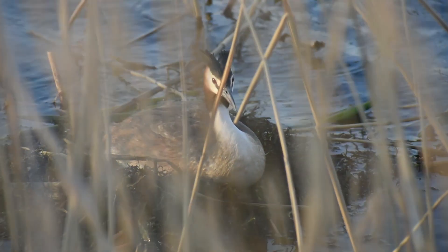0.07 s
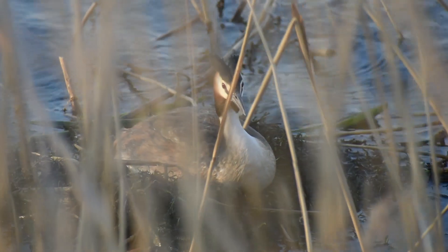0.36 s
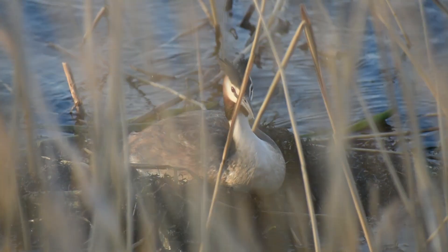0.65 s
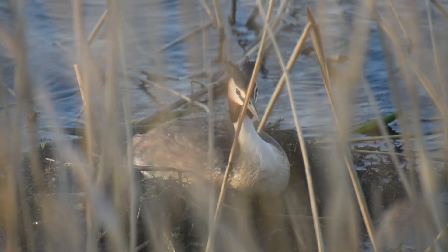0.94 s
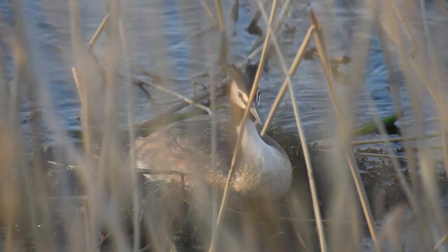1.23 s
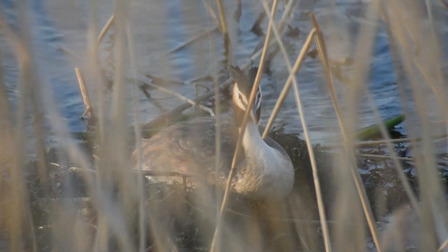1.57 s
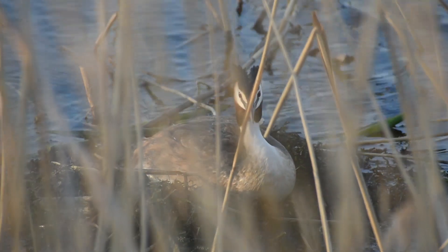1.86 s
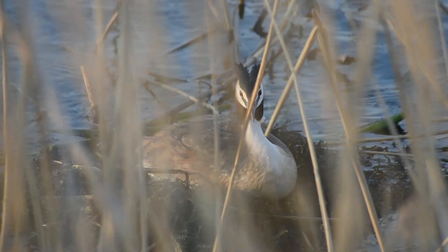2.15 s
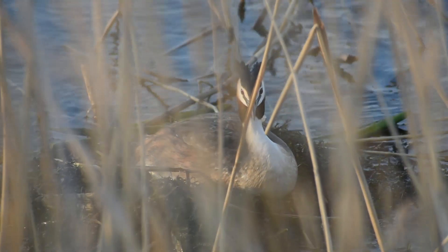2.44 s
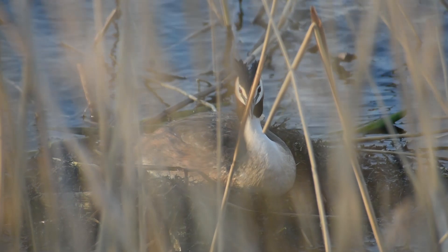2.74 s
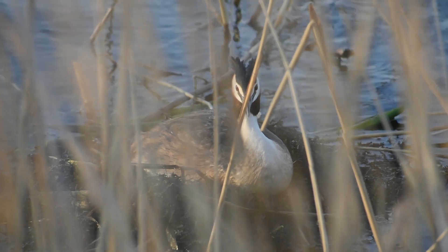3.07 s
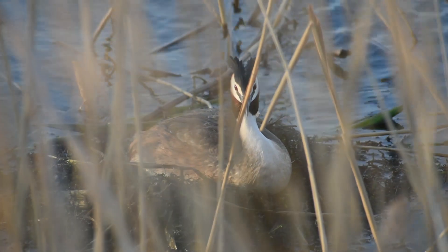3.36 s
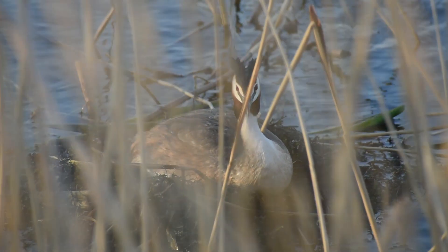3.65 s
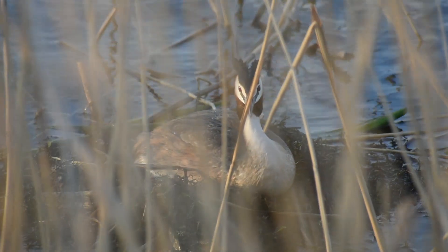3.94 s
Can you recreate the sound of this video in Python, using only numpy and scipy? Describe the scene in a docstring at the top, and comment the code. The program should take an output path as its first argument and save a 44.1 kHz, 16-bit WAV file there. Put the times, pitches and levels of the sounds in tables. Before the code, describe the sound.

Uneven gusts of wind thump and rumble on the microphone beside reeds and water. The opening gusts are the strongest, and a second burst follows a quieter stretch, while the reeds hiss and sigh faintly in the background.

```python
"""Gusts of wind buffet a microphone at the reedy edge of a lake.
Turbulent pressure on the diaphragm makes a deep rumble, single eddies thump it, and the harder gusts
break into a higher flutter with sharp puffs at their crests. Behind them lie a steady hiss, faint sighs
of wind in the reeds and a fine crackle that repeats 50 times a second, like a distant power line."""
import numpy as np
from scipy import signal
from scipy.fft import rfft, irfft
from scipy.ndimage import uniform_filter1d
import sys
import numpy as np
from scipy import signal
from scipy.fft import rfft, irfft
from scipy.io import wavfile
from scipy.ndimage import uniform_filter1d

SR = 44100
rng = np.random.default_rng(int(sys.argv[2]) if len(sys.argv) > 2 else 0)


def bounce(signal):
    """Save signal as a 16-bit WAV file at the path given by the first command-line argument."""
    frames = np.transpose(np.atleast_2d(signal))
    limited = np.clip(frames, -1, 1)
    pcm = np.round(limited * 32767).astype(np.int16)
    wavfile.write(sys.argv[1], SR, pcm)


N = 176400


def amp(db):
    """Amplitude ratio: tenfold for every 20 dB."""
    return 10 ** (np.asarray(db) / 20)


def unit(x):
    """Normalisation to an rms of 1."""
    return x / np.sqrt(np.mean(x ** 2) + 1e-20)


def at_hz(points, hz):
    """Interpolation on a log-frequency axis."""
    f, value = np.transpose(points)
    return np.interp(np.log(hz + 1), np.log(f + 1), value)


def at_time(points):
    """Linear interpolation of a curve at every sample."""
    return np.interp(np.arange(N) / SR, *np.transpose(points))


def colour(x, points, size=8192):
    """Minimum-phase filtering: a causal response shapes the spectrum; the result has rms 1."""
    log_gain = np.log(amp(at_hz(points, abs(np.fft.fftfreq(size, 1 / SR)))))
    response = np.exp(np.conj(signal.hilbert(log_gain)))
    taps = np.fft.ifft(response).real[:size // 2]
    return unit(irfft(rfft(x) * rfft(taps, N), N))


def steadied(x, span_s):
    """Division by the running rms holds a random flow even over spans longer than span_s."""
    size = max(int(span_s * SR), 8)
    power = uniform_filter1d(uniform_filter1d(x ** 2, size), size)
    return unit(x / np.sqrt(abs(power) + 1e-4))


def eddies(rate_per_s=420, spread_db=6):
    """Shot noise: eddies strike at random, each a pressure impulse of random size and sign."""
    size = amp(spread_db * np.minimum(rng.exponential(1, N), 4))
    sign = rng.choice([-1., 1.], N)
    return size * sign * (rng.random(N) < rate_per_s / SR)


# Spectrum of the deep wind pressure: frequency_hz, relative_db
RUMBLE_SPECTRUM = [(10, -49), (25, -11.5), (45, 2), (65, 0), (92, 0.5), (130, -7), (200, -20.5), (300, -31),
                   (600, -71), (2000, -74.5)]

def rumble(gust_db, knee_db=-26):
    """Saturation: low turbulent noise grows with the gust, then levels off above the knee."""
    push = amp(gust_db) / np.sqrt(1 + amp(gust_db - knee_db) ** 2)
    turbulence = colour(rng.standard_normal(N), RUMBLE_SPECTRUM)
    return amp(0.5) * push * steadied(turbulence, span_s=0.05)


# Spectrum of one thump: frequency_hz, relative_db
THUMP_SPECTRUM = [(20, -51.5), (70, -12.5), (130, 0.5), (190, -1.5), (290, -8.5), (390, -25), (800, -76.5),
                  (2500, -101.5)]

def thumps(kicks, gust_db, flutter_db, flutter_share=0.51):
    """Impulse response: each eddy gives the diaphragm a short, low thump."""
    drive_db = (1 - flutter_share) * gust_db + flutter_share * (flutter_db + 12.5)
    return amp(drive_db - 4.5) * steadied(colour(kicks, THUMP_SPECTRUM), span_s=0.029)


# Spectrum of the flutter: frequency_hz, relative_db
FLUTTER_SPECTRUM = [(30, -21), (130, -10.5), (290, 2.5), (420, -10.5), (600, -25.5), (900, -42),
                    (1400, -57), (4000, -84)]

def flutter(kicks, flutter_db):
    """Impulse excitation: in hard gusts the same eddies drive a higher band, near 290 Hz."""
    return amp(flutter_db + 3.5) * steadied(colour(kicks, FLUTTER_SPECTRUM), span_s=0.027)


# Spectrum of the swirl: frequency_hz, relative_db
SWIRL_SPECTRUM = [(25, -44.5), (70, -31), (150, -1), (330, 1.5), (500, -7), (750, -19.5), (1100, -34.5),
                  (1600, -42), (4000, -63)]

def swirl(flutter_db):
    """Antiphase pressure: a small swirl pushes the two microphone ports in opposition."""
    pressure = amp(flutter_db - 16.5) * steadied(colour(eddies(), SWIRL_SPECTRUM), span_s=0.063)
    return pressure * np.array([[1], [-1]])


# Push of the wind on the microphone: time_s, relative_db
GUST_ENVELOPE = [(0.0, -30), (0.02, -9.5), (0.08, -26), (0.13, -10), (0.17, -47), (0.2, -20), (0.29, -27.5),
                 (0.32, -24), (0.43, -26.5), (0.49, -35.5), (0.57, -37.5), (0.63, -25), (0.68, -44),
                 (0.73, -29), (0.77, -47), (0.79, -31.5), (0.85, -21), (0.91, -29.5), (0.93, -25),
                 (1.04, -30.5), (1.08, -48.5), (1.17, -36.5), (1.26, -36), (1.29, -22), (1.41, -41.5),
                 (1.5, -33), (1.54, -38), (1.68, -28), (1.7, -41), (1.77, -33.5), (1.85, -47),
                 (2.07, -27.5), (2.1, -48.5), (2.39, -37.5), (2.41, -45), (2.46, -32), (2.53, -52.5),
                 (2.57, -22), (2.63, -40), (2.67, -15.5), (2.84, -29.5), (2.86, -12), (2.9, -45),
                 (2.94, -15.5), (2.96, -32), (3.0, -23), (3.04, -33), (3.07, -27.5), (3.17, -51),
                 (3.22, -32), (3.26, -35), (3.29, -38), (3.4, -34), (3.52, -51), (3.64, -44.5), (3.69, -30),
                 (3.77, -41.5), (3.91, -38), (3.94, -25.5), (4.0, -39)]
# Strength of the flutter within the gusts: time_s, relative_db
FLUTTER_ENVELOPE = [(0.0, -50), (0.02, -32), (0.03, -34), (0.07, -37.5), (0.12, -34), (0.13, -19.5),
                    (0.14, -30), (0.19, -31), (0.21, -22), (0.24, -34.5), (0.29, -26.5), (0.32, -25),
                    (0.34, -26), (0.37, -31), (0.41, -46), (0.42, -24), (0.44, -42), (0.54, -71),
                    (0.62, -49), (0.71, -58), (0.86, -44.5), (0.92, -54), (0.95, -37.5), (1.08, -64),
                    (1.25, -67), (1.29, -36), (1.3, -48), (1.38, -43), (1.4, -64), (1.47, -64), (1.49, -45),
                    (1.56, -56), (1.58, -47), (1.6, -63), (2.55, -75), (2.58, -42), (2.68, -60),
                    (2.71, -39.5), (2.74, -33), (2.77, -52), (2.78, -43), (2.8, -42.5), (2.86, -53),
                    (2.9, -73), (2.94, -45), (3.02, -59), (3.09, -39.5), (3.12, -70), (3.19, -70),
                    (3.22, -38), (3.25, -57.5), (3.65, -84), (3.72, -54), (3.89, -82), (3.92, -45),
                    (4.0, -45.5)]

def wind():
    """Turbulent buffeting: rumble, thumps and flutter reach both ports in phase; the swirl adds width."""
    gust_db, flutter_db = at_time(GUST_ENVELOPE), at_time(FLUTTER_ENVELOPE)
    kicks = eddies()
    in_phase = rumble(gust_db) + thumps(kicks, gust_db, flutter_db) + flutter(kicks, flutter_db)
    return in_phase + swirl(flutter_db)


# Spectrum of the background hiss: frequency_hz, relative_db
HISS_SPECTRUM = [(30, 3.9), (200, 6), (290, 11.55), (390, -2), (600, 0.5), (780, -2), (1100, 0.4),
                 (1600, -3), (2500, -7), (4000, -9), (6300, -13), (10000, -22), (15500, -33)]
# Likeness of the hiss at left and right: frequency_hz, coherence_ratio
HISS_COHERENCE = [(100, 1), (1200, 1), (2500, 0.98), (5000, 0.96), (9000, 0.42), (15000, .2)]
# Distant sighs: peak_s, length_s, centre_hz, glide_octaves_per_s, level_over_hiss_db
REED_SIGHS = [(.04, .11, 1500, 5, 7), (.82, .2, 2150, -.3, 4), (.99, .18, 1920, -.5, 5),
              (2.1, .9, 1130, 0, -1), (2.28, .4, 1800, 0, 0), (3.55, .5, 1150, 0, -3),
              (3.95, .25, 1850, 0, 0)]

def reeds(level_db=-57, left_over_right_db=-1.14, patchy_db=1.0, sigh_width_octaves=0.16):
    """Flow noise: air over reeds and water hisses; narrow bands swell into sighs, some gliding."""
    window, hop = 1024, 256
    frames, hz = N // hop + 5, np.fft.rfftfreq(window, 1 / SR)
    t = np.arange(frames)[:, None] * hop / SR
    left_re, left_im, apart_re, apart_im, patches = rng.standard_normal((5, frames, len(hz)))
    patches = uniform_filter1d(patches, size=20, axis=0)  # level ripple, smooth in time
    patches = unit(uniform_filter1d(patches, size=10, axis=1))  # and in frequency
    power = 1
    for peak_s, length_s, centre_hz, glide, db in REED_SIGHS:
        octaves_off = np.log2((hz + 1) / centre_hz) - glide * (t - peak_s)
        falloff = (2 * (t - peak_s) / length_s) ** 2 + (octaves_off / sigh_width_octaves) ** 2
        power = power + amp(db) ** 2 * np.exp(-falloff)
    coherence = np.clip(at_hz(HISS_COHERENCE, hz), 0, 1)
    left = left_re + 1j * left_im
    right = coherence * left + np.sqrt(1 - coherence ** 2) * (apart_re + 1j * apart_im)
    gain = np.sqrt(power) * amp(at_hz(HISS_SPECTRUM, hz) + patchy_db * patches)
    spectra = np.array([left, right]) * gain
    _, hiss = signal.istft(spectra, nperseg=window, noverlap=window - hop, time_axis=1, freq_axis=2)
    return amp(level_db + left_over_right_db * np.array([[.5], [-.5]])) * unit(hiss[:, :N])


# Places in the mains cycle where sparks gather: delay_s, scatter_s, relative_db
SPARK_TIMING = [(.0103, 0.000098, 0), (.0142, .0002, -3), (.0188, 0.00013, 5.5), (0.0216, 0.00041, -3),
                (.0006, .0005, -4.5), (.0012, .0005, -3), (.0111, 0.0013, -6.5), (0.014, .0005, -2.5)]
# Spectrum of one spark: frequency_hz, relative_db
SPARK_SPECTRUM = [(500, -40), (1500, 2.5), (3500, 4), (7000, 0.5), (10000, -5.5), (15500, -14)]
# Slow swell of the crackle: time_s, relative_db
CRACKLE_ENVELOPE = [(0, 0.5), (.6, -0.5), (1.25, 1.5), (1.55, 0.5), (2.02, 1.5), (2.3, 0.5), (2.8, -0.5),
                    (3.15, -1.5), (4, 0)]

def crackle(mains_hz=49.977, spread_db=3.4, apart_db=-5):
    """Periodic discharge: tiny, uneven sparks fire at nearly the same phases of each mains cycle."""
    cycles_s = np.arange(0, N / SR, 1 / mains_hz)
    clicks = np.zeros((2, N))
    for delay_s, scatter_s, db in SPARK_TIMING:
        late, size = rng.standard_normal((2, len(cycles_s)))
        at = np.round((cycles_s + delay_s + scatter_s * late) * SR).astype(int) % N
        sign = rng.choice([-1., 1.], (2, len(cycles_s)))
        clicks[:, at] += amp(db + spread_db * np.minimum(size, 2)) * sign
    shared, apart = colour(clicks, SPARK_SPECTRUM) * amp([[0], [apart_db]])
    return amp(at_time(CRACKLE_ENVELOPE) - 68) * np.array([shared + apart, shared - apart])


# Sharp puffs at the crests of the gusts: peak_s, length_s, level_db
CREST_PUFFS = [(0.149, 0.037, -32.5), (.226, 0.026, -33), (0.3, 0.036, -43), (0.413, 0.017, -64),
               (0.977, 0.019, -61), (1.282, 0.016, -60), (1.494, 0.01, -70), (2.575, 0.013, -52),
               (2.672, 0.014, -52), (2.747, 0.024, -47.5), (3.224, .02, -60)]
# Spectrum of a puff: frequency_hz, relative_db
PUFF_SPECTRUM = [(60, -25), (300, -2), (500, 5), (800, -7.5), (1200, -22), (1800, -37), (5000, -68)]

def puffs(apart_db=-5):
    """Partial coherence: brief bursts of fine turbulence reach the two ports only partly alike."""
    t = np.arange(N) / SR
    swell = sum(amp(db) * np.exp(-(2 * (t - peak_s) / length_s) ** 2)
                for peak_s, length_s, db in CREST_PUFFS)
    shared, apart = [steadied(colour(air, PUFF_SPECTRUM), span_s=0.011)
                     for air in rng.standard_normal((2, N))]
    return swell * (shared + amp(apart_db) * apart * np.array([[1], [-1]]))


def scene():
    """Superposition: wind on the microphone adds to the quiet lakeside."""
    return wind() + puffs() + reeds() + crackle()


def record(dry, cutoff_hz=15720):
    """Band limiting: a steep linear-phase low-pass removes the highest treble."""
    taps = signal.firwin(1023, cutoff_hz, window=("kaiser", 9), fs=SR)
    return signal.oaconvolve(dry, taps[None], "same")


dry = scene()
out = record(dry)
bounce(out)
```